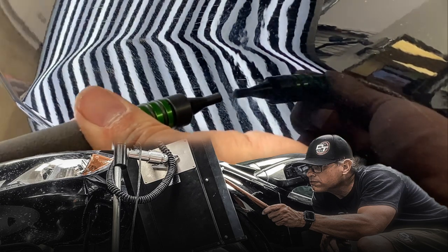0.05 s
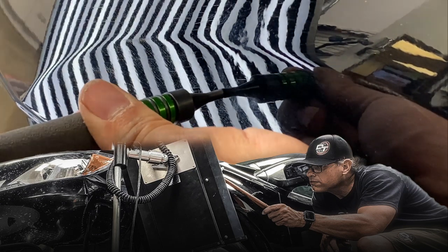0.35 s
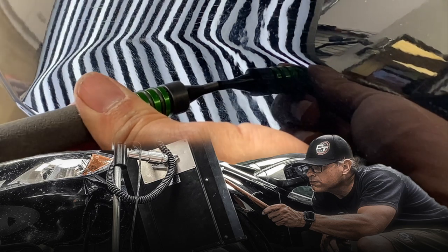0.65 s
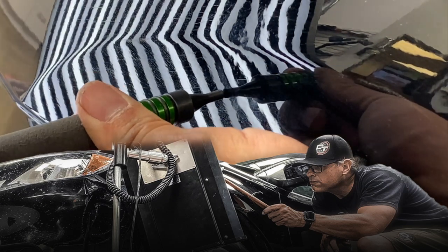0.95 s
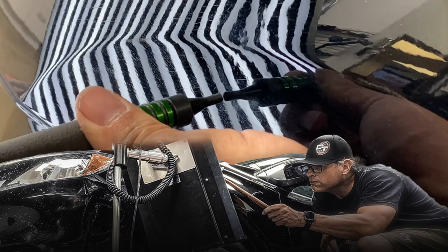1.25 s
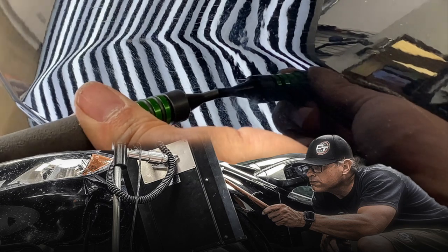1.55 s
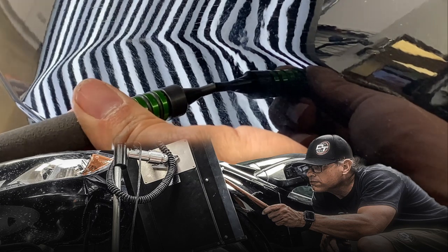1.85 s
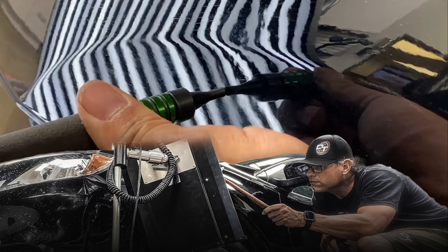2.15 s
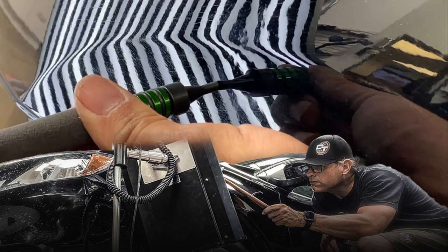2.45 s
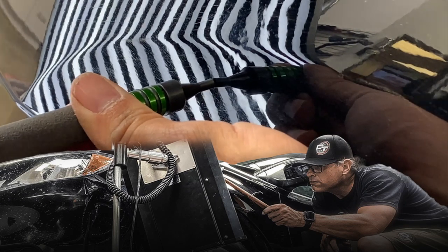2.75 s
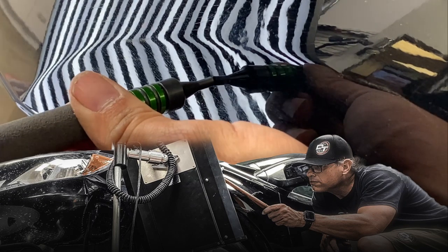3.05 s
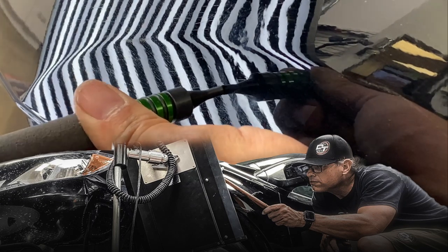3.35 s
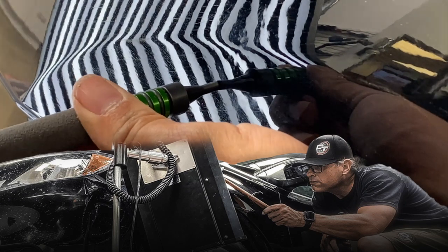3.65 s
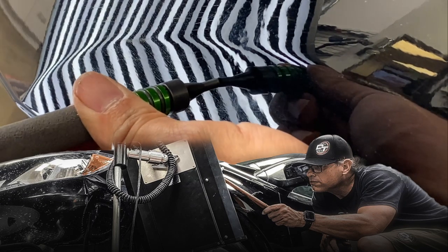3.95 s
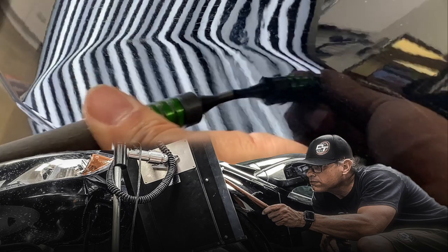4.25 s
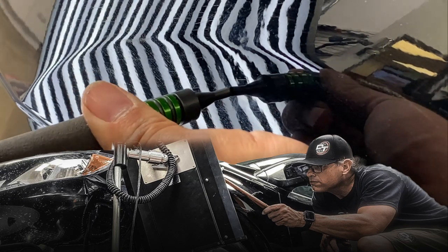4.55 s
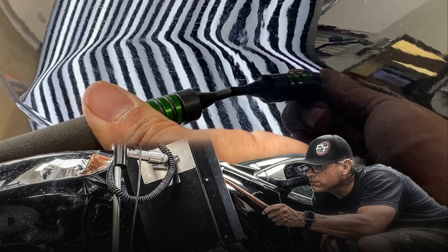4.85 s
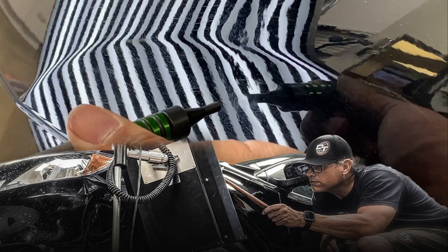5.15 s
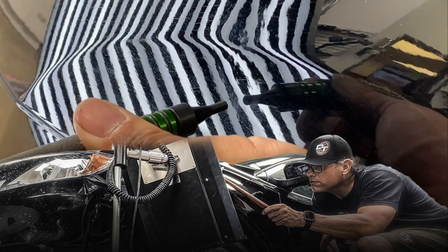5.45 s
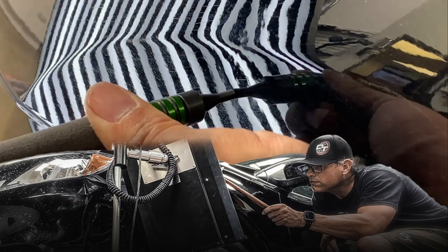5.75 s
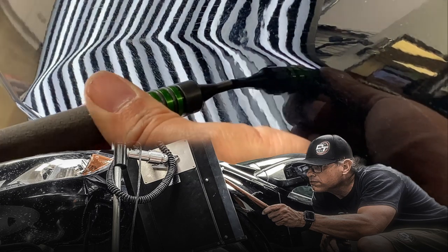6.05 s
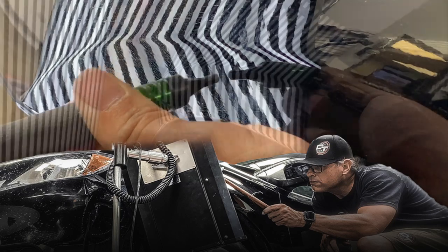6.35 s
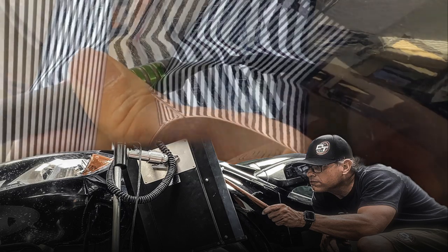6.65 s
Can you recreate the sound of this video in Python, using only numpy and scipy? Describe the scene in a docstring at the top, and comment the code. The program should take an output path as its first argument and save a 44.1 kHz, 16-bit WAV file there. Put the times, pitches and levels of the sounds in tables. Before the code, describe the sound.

Quick, even hammer taps drive a plastic-tipped punch against a dent in a car's sheet metal, heard from very close. The blows crack and drum with a small hollow boom, some brighter than others, and the workshop rings faintly after them. They come in three runs, each shorter than the one before, with soft, dull scuffs as the tip is set down. A low machine hum and a light rush of air continue underneath.

```python
"""A machine hums in a faintly ringing workshop; then, close to the phone's microphones, a hammer taps
a plastic-tipped punch against a dent in a car's body panel. Each blow cracks, drums the sheet metal
and booms the hollow behind it, and the shop answers faintly. Between runs the tip is set down softly.
The phone's limiter flattens the blows."""
import sys
import numpy as np
from scipy import signal
from scipy.fft import rfft, irfft, next_fast_len
from scipy.io import wavfile
from scipy.ndimage import uniform_filter1d, minimum_filter1d

SR = 44100
rng = np.random.default_rng(int(sys.argv[2]) if len(sys.argv) > 2 else 0)


def generate_wav(signal):
    """Clip the signal to [-1, 1] and save it as 16-bit WAV at the path in sys.argv[1]."""
    frames = np.transpose(np.atleast_2d(signal))
    scaled = np.clip(frames, -1, 1) * 32767
    pcm = np.round(scaled).astype(np.int16)
    wavfile.write(sys.argv[1], SR, pcm)


N = 295029
TIME = np.arange(N) / SR


def undb(db):
    return 10 ** (np.asarray(db) / 20)


def pan(db):
    """Left and right gains for a left-minus-right level."""
    return undb(np.array([[db], [-db]]) / 2)


def gains(points, size):
    """Gain at each bin of a transform, from (f/Hz, level/dB) points on a log-frequency axis."""
    hz, db = np.transpose(points)[:2]
    log_f = np.log(np.fft.rfftfreq(size, 1 / SR) + 1)
    return undb(np.interp(log_f, np.log(hz), db))


def causal(gain):
    """Minimum-phase spectrum with these gains: nothing sounds before the blow."""
    cepstrum = irfft(np.log(gain))
    half = len(cepstrum) // 2
    cepstrum[1:half] *= 2
    cepstrum[half + 1:] = 0
    return np.exp(rfft(cepstrum))


def noise(points):
    """Steady noise with a spectrum of (f/Hz, level/dB) points."""
    size = next_fast_len(N + N % 2, True)
    return irfft(rfft(rng.standard_normal(size)) * gains(points, size), size)[:N]


def tail(bands, size, wide_hz, width):
    """Stereo noise dying away at each band's own rate; the sides differ most around wide_hz."""
    hz, _, t60s = np.transpose(bands)
    log_f = np.log(np.fft.rfftfreq(size, 1 / SR) + 1)
    spread = width * np.exp(-((log_f - np.log(wide_hz)) / 0.84) ** 2)
    mid, side = rfft(rng.standard_normal((2, size)))
    stereo = (mid + np.array([[1], [-1]]) * spread * side) / np.sqrt(1 + spread ** 2)
    spectrum = stereo * gains(bands, size)
    out = 0
    for share, t60 in zip(np.eye(len(hz)), t60s):
        band = irfft(spectrum * np.interp(log_f, np.log(hz), share), size)
        out = out + band * np.exp(-np.log(1000) * TIME[:size] / t60)
    return out


def add(track, s, sound):
    """Lay a sound into a track at s seconds."""
    i = int(s * SR)
    track[..., i:i + sound.shape[-1]] += sound[..., :N - i]


def through(x, response):
    return signal.fftconvolve(np.atleast_2d(x), response, axes=-1)[:, :N]


def machine(hum_hz=89.2, waver_rad=0.35, air_db=-13):
    """Room tone: a machine's wavering hum in a rush of moving air, both swelling and sinking a little."""
    # air and machine noise common to both microphones, and differing between them: f/Hz, level/dB
    air_mid = [(22, -46), (55, 1), (100, 1.5), (140, -10), (250, -7), (350, -17), (650, -20), (1100, -33),
               (1700, -28), (2500, -37), (4000, -42.5), (7500, -48.5), (10000, -55.5), (15000, -68)]
    air_side = [(22, -45), (70, -38), (250, -9.5), (400, -17), (700, -28), (1300, -25.5), (2400, -49),
                (4400, -83), (15000, -61)]
    # drift of the room tone: t/s, level/dB
    drift = [(0, 2.5), (2.5, 1), (4.6, 0.5), (5.4, -2.5), (6.3, -0.5), (6.6, 0.5)]
    waver = noise([(1, -4), (4, -1), (12, -31), (40, -120)])
    phase = 2 * np.pi * hum_hz * TIME + waver_rad * waver / waver.std()
    hum = np.sqrt(2) * (undb(-35.5) * np.sin(phase) + undb(-50) * np.sin(2 * phase))
    air = noise(air_mid) + np.array([[1], [-1]]) * noise(air_side)
    swell = undb(np.interp(TIME, *np.transpose(drift)))
    return pan(db=-1.5) * (hum + undb(air_db) * air) * swell


def shop_answer(pushes, level_db=-20, build_s=0.004, early_s=0.1):
    """The walls answer each blow a moment later; at first they still ring from one early_s before."""
    # the workshop's reverberation: f/Hz, level/dB, t60/s
    bands = [(60, -26, 1.2), (252, 6.5, 1.25), (407, -7.5, 1.4), (605, -9, 1.7), (1110, -8, 2.02),
             (1670, -15, 1.37), (2570, -19, 1.16), (3900, -34, 1.46), (7460, -36, 1.33),
             (15000, -46.5, 0.36)]
    room = tail(bands, size=65536, wide_hz=650, width=1.0)
    room *= 1 - np.exp(-TIME[:room.shape[1]] / build_s)
    early_blow = contact(strength_db=0.5, hardness_db=12)
    out = through(pushes, room)
    add(out, 0, through(early_blow, room)[:, int(early_s * SR):])
    return undb(level_db) * out


def contact(strength_db, hardness_db):
    """The push of one blow: a harder contact trades drum for treble."""
    # spectrum of the push: f/Hz, level of a usual blow/dB, gain per hardness/(dB/dB)
    spectrum = [(300, 1.07, -0.17), (1070, -1.6, -0.07), (1700, 1.5, 0.22), (2700, 0.5, .5),
                (4400, 1, 0.89), (6860, -3.5, 1)]
    points = [(hz, db + strength_db + slope * hardness_db) for hz, db, slope in spectrum]
    return irfft(causal(gains(points, size=256)))[None]


def crack(size, db=29, travel_s=0.001196):
    """Bending waves run faster the higher they are, so the crack sweeps downward."""
    # the first crack of the sheet metal: f/Hz, level/dB
    spectrum = [(100, -15.5), (350, -5), (550, -1), (800, -20.5), (1150, -7.5), (1520, -21.5), (2000, -9.5),
                (2330, -16.5), (2750, -8), (3500, -24), (4300, -19.5), (4900, -35), (10000, -40.5),
                (15500, -37)]
    f = np.fft.rfftfreq(size, 1 / SR)
    sweep = np.exp(-4j * np.pi * travel_s * np.sqrt(1000 * f))  # 1 kHz arrives after travel_s
    chirp = irfft(causal(gains(spectrum, size)) * sweep)
    return undb(db) * chirp * (np.arange(size) < size // 2)


def swing(size, hz, peak_s, steep, db, pan_db):
    """A heavily damped resonance that swells, swings for a few cycles and is gone."""
    t = TIME[:size]
    swell = (t / peak_s * np.exp(1 - t / peak_s)) ** steep
    return -undb(db) * pan(pan_db) * swell * np.cos(2 * np.pi * hz * (t - peak_s))


def shimmer(size, build_s=0.00035):
    """A dense ring builds up as the waves return from the panel's edges."""
    # the panel's countless weaker modes, in bands: f/Hz, level/dB, t60/s
    bands = [(100, -40, .15), (394, -5.5, 0.19), (1080, -7.5, 0.13), (1720, -10, 0.11), (2470, -12.5, 0.11),
             (3930, -27.5, 0.098), (6400, -29.5, 0.11), (15500, -46, 0.17)]
    return tail(bands, size, wide_hz=595, width=0.33) * (1 - np.exp(-TIME[:size] / build_s))


def panel_ring(size, detune=0.0052, scatter_db=1.73):
    """The sheet metal drums in modes of alternating sign; each blow lands a little differently."""
    # panel modes at the microphones: f/Hz, level/dB, t60/s, left minus right/dB, left phase lead/rad
    modes = [(66.5,-21.5,0.18,-18.5,0.2), (86.2,-15.5,0.16,-4.5,1.05), (160.2,-18,0.18,-9,.5),
             (184.8,-34,0.33,4,-3.5), (202.4,-12.5,0.085,0.5,-1.03), (243.9,-5,0.093,-11.5,-0.13),
             (273.2,-7,.12,-11.5,0), (318,-17.5,0.09,-8.5,-2), (335,-25,0.18,-10,1.24),
             (386.1,-30,0.22,3.5,0.9), (440,-23,0.18,-3,-0.5), (471.8,-19.5,0.18,-10,-2),
             (510.7,-21,0.099,-16.5,5), (560.6,-34.5,0.19,-10,4.5), (611,-19,0.064,13.5,0),
             (689,-21,0.13,6,1), (748.4,-24.5,0.16,-11,2), (800,-12.5,0.073,0,3), (922,-27.5,0.11,16.5,1.5),
             (981,-17,0.12,1.5,-0.5), (1042,-26,0.09,20,-1.2), (1156.4,-26.5,0.14,-9.5,4),
             (1234,-21.5,0.13,-6,.5), (1723,-36.5,0.077,26.5,-1.5), (1836,-32,0.15,1,4.5),
             (2109,-24,0.069,-2,-0.4), (2256,-28,0.051,8,-1), (2780,-47,0.056,5,-1),
             (2936,-28,0.046,-1,4.5)]
    chance = rng.standard_normal((len(modes), 2))
    out = 0
    for k, (hz, db, t60, pan_db, lead) in enumerate(modes):
        pitch, level = chance[k]
        ring = np.exp((2j * np.pi * hz * (1 + detune * pitch) - np.log(1000) / t60) * TIME[:size])
        stereo = pan(pan_db) * (np.exp(1j * np.array([[lead], [0]])) * ring).imag
        out = out + (-1) ** k * undb(db + scatter_db * level) * stereo
    return out


def punch_ring(size, detune=0.0016, scatter_db=3.0):
    """The hand damps the tools' ping quickly, and its grip shifts between blows."""
    # modes of the hammer and punch: f/Hz, level/dB, t60/s
    modes = [(3770, -34.5, 0.044), (4340, -36.5, 0.047), (4460, -60, 0.035), (5240, -42, 0.031),
             (6250, -58, .05), (8790, -29.5, 0.038), (9140, -35, 0.037)]
    t, out = TIME[:size], 0
    for hz, db, t60 in modes:
        pitch, level = rng.standard_normal(2)
        ping = np.sin(2 * np.pi * hz * (1 + detune * pitch) * t) * np.exp(-np.log(1000) * t / t60)
        out = out + undb(db + scatter_db * level) * ping
    return out


def sizzle(size, db=-25, t60=0.052):
    """A short treble fizz follows the contact, different on every blow."""
    bands = [(2000, -33, t60), (4660, 1.5, t60), (9850, -0.5, t60), (15300, -11.0, t60)]
    return undb(db) * tail(bands, size, wide_hz=600, width=0)


def hammering(size=12288, alike_shimmer_db=-4, fresh_shimmer_db=-6):
    """Every blow sounds the same panel, close up, and the same shop around it."""
    # hammer blows, relative to a usual one: t/s, strength/dB, hardness as extra treble/dB
    taps = [(0.173, 0.5, -4.5), (0.3857, 0, -8), (0.5881, -0.2, -5.5), (0.7994, 0.5, -1),
            (1.028, 0.5, -4.5), (1.2352, -0.2, 10.5), (1.476, -0.9, 1), (1.6806, 0.3, -1.5),
            (1.8848, 0, 3.5), (2.1473, 0.4, 0), (2.361, -0.5, -5), (2.5584, 1.4, -1.5), (2.7735, .3, -3),
            (3.0087, 0.2, -1.3), (3.2134, -0.6, 1.5), (3.4576, 0.2, 3), (3.6664, -1.3, 3.5),
            (4.0388, .3, 1.5), (4.2564, -0.5, -1), (4.525, .5, 2), (4.7294, -0.8, 2.5), (4.9378, .6, 11),
            (5.841, 0.5, -4.5), (6.0615, -0.2, -7), (6.2651, -3.5, 0)]
    # the metal right under the tip knocks; the hollow behind the panel booms late
    knock = swing(size, hz=1125, peak_s=0.0017, steep=1.77, db=-5, pan_db=-3)
    boom = swing(size, hz=77.4, peak_s=0.02093, steep=3.8, db=-13.5, pan_db=-9.5)
    alike = crack(size) + knock + boom + undb(alike_shimmer_db) * shimmer(size)
    direct, pushes = np.zeros((2, N)), np.zeros((1, N))
    for s, strength_db, hardness_db in taps:
        push = contact(strength_db, hardness_db)
        rings = panel_ring(size) + punch_ring(size)
        fresh = rings + undb(fresh_shimmer_db) * shimmer(size) + sizzle(size)
        add(direct, s, through(push, alike + fresh))
        add(pushes, s, push)
    return direct + shop_answer(pushes)


def tip_touches(size=8192, ring_db=-7, scuff_db=6):
    """The plastic tip lands lightly: a dull scuff with little ring."""
    # the tip meets the paint: t/s, level/dB
    touches = [(2.083, -21.5), (2.945, -24.5), (3.909, -18.5), (4.47, -23.5), (5.758, -29)]
    out = np.zeros((2, N))
    for s, db in touches:
        scuff = undb(scuff_db) * shimmer(size, build_s=0.004)
        ring = undb(ring_db) * panel_ring(size)
        add(out, s, undb(db) * (scuff + ring))
    return out


def treble_lag(x, above_hz=6600, lag_s=0.00026):
    """The phone's stereo pickup delays the highest treble of one side."""
    size = next_fast_len(N, True)
    f = np.fft.rfftfreq(size, 1 / SR)
    delay = np.exp(-2j * np.pi * lag_s * np.maximum(f - above_hz, 0))
    return irfft(rfft(x, size) * delay, size)[:N]


def scene():
    """Dent work in the foreground, over the workshop's room tone."""
    return hammering() + tip_touches() + machine()


def record(dry, ceiling=0.91, limiter_s=0.0025, top_hz=15900):
    """The phone by the panel: the left treble lags, a fast limiter ducks both sides, the top is cut."""
    heard = np.array([treble_lag(dry[0]), dry[1]])
    window = int(limiter_s * SR)
    peak = np.abs(heard).max(axis=0)
    needed = np.minimum(1, ceiling / (peak + 1e-9))
    gain = uniform_filter1d(minimum_filter1d(needed, window), window)
    top_cut = signal.ellip(8, 0.2, 70, top_hz, fs=SR, output="sos")
    return signal.sosfilt(top_cut, heard * gain)


dry = scene()
out = record(dry)
generate_wav(out)
```